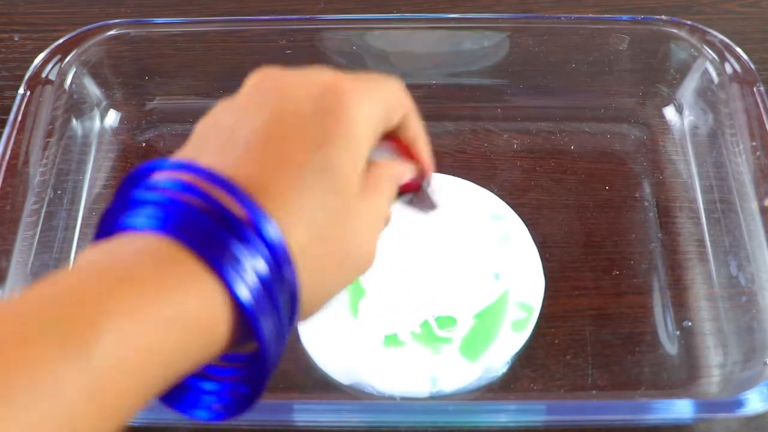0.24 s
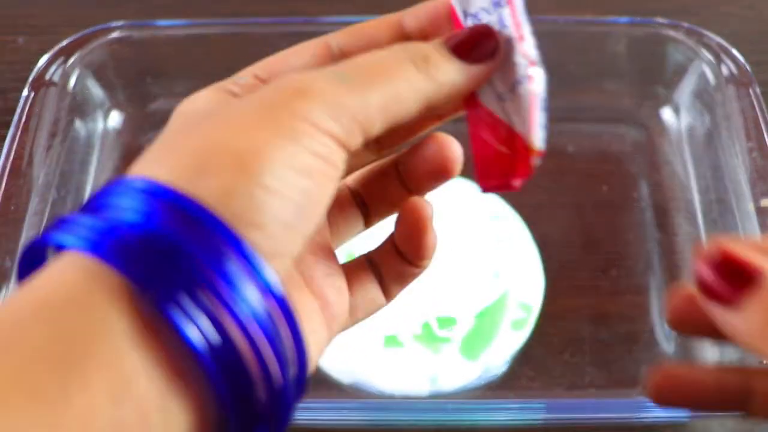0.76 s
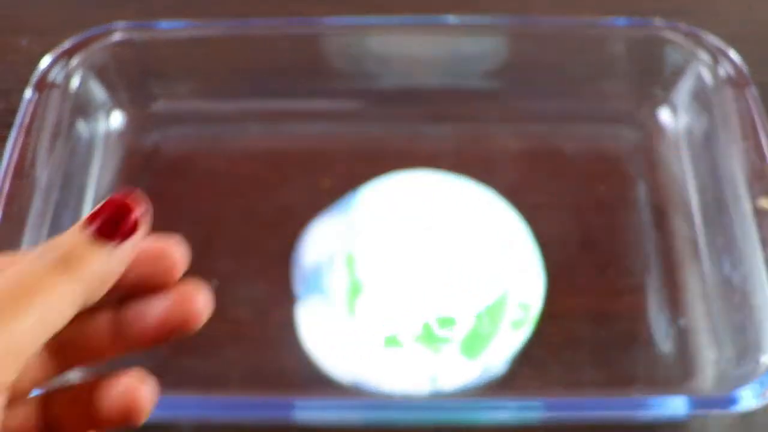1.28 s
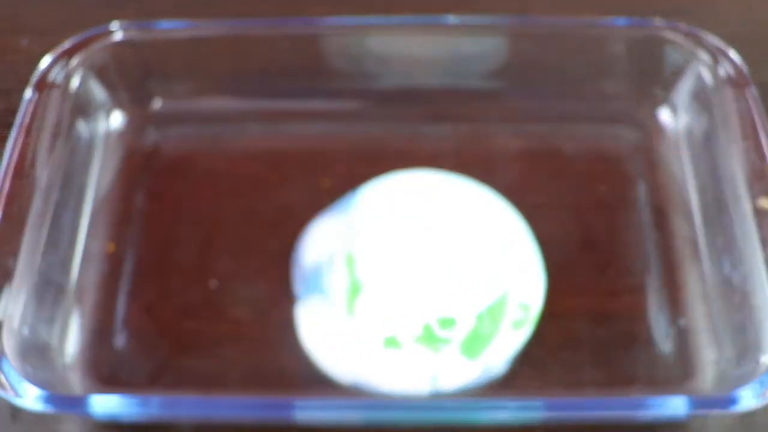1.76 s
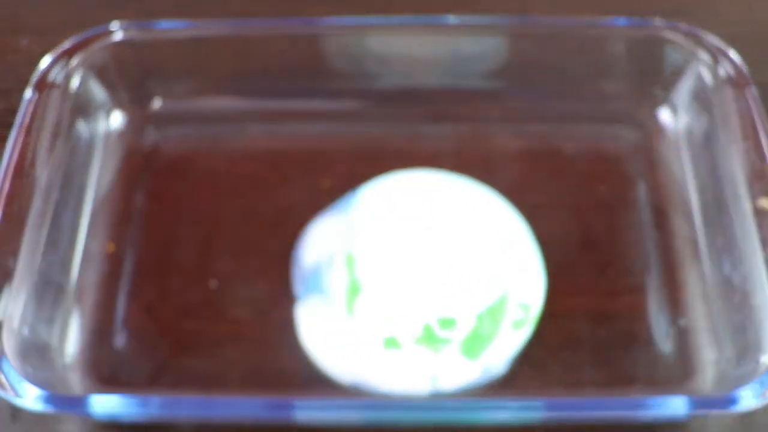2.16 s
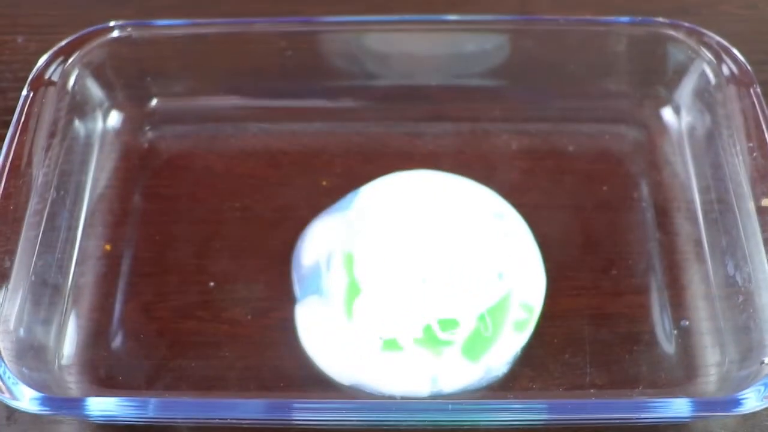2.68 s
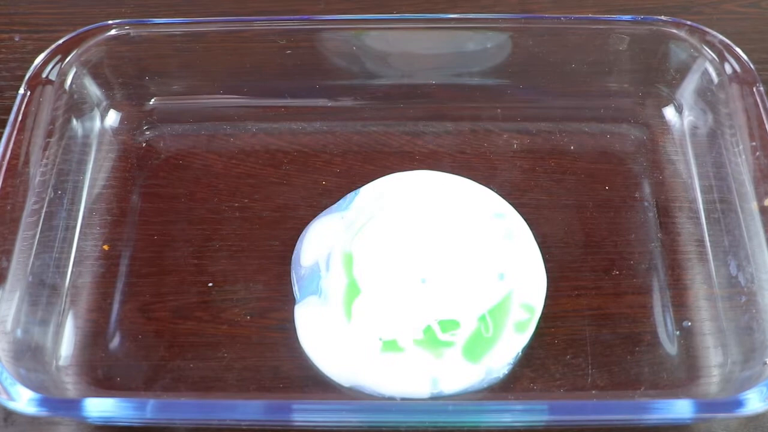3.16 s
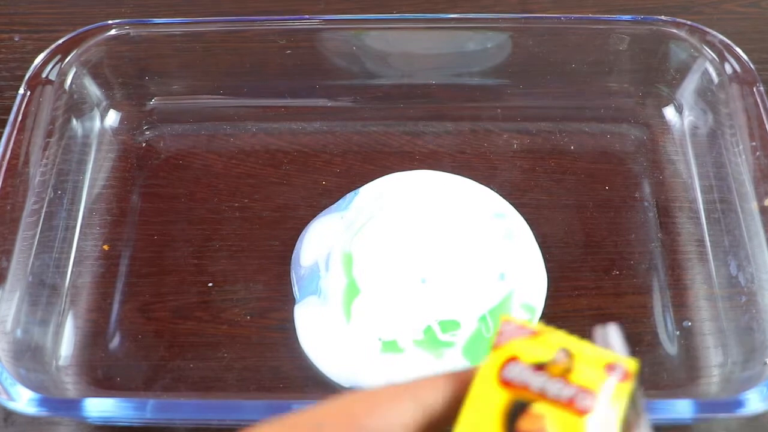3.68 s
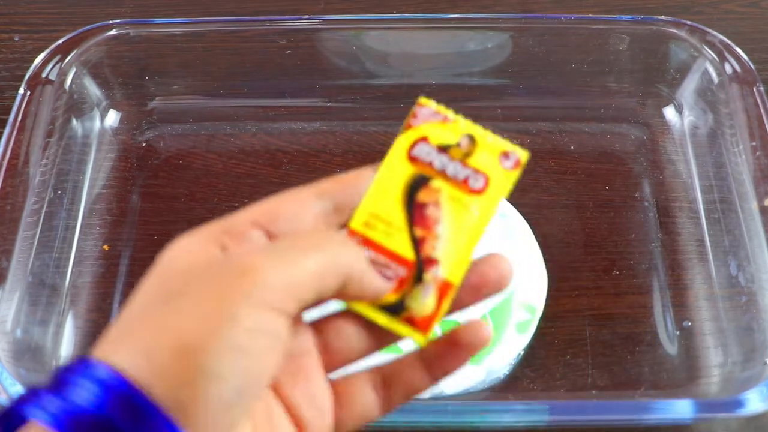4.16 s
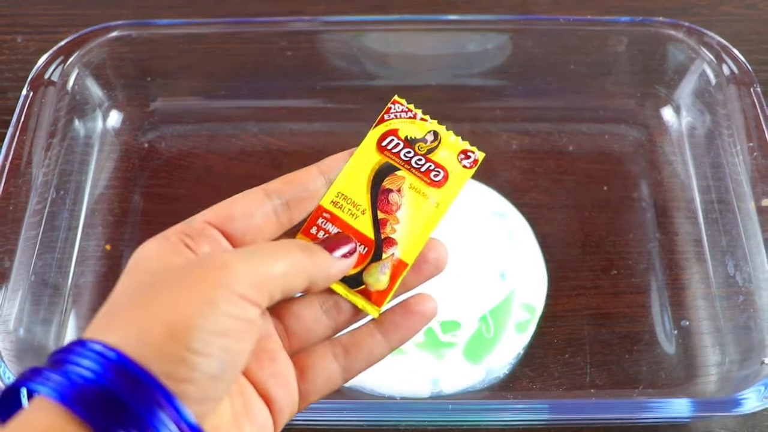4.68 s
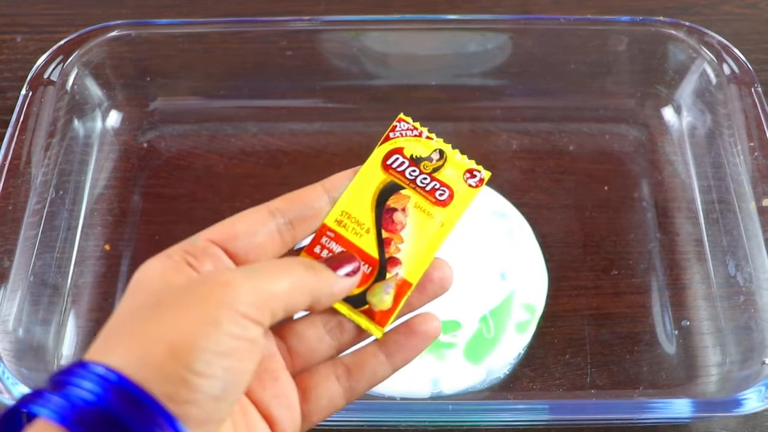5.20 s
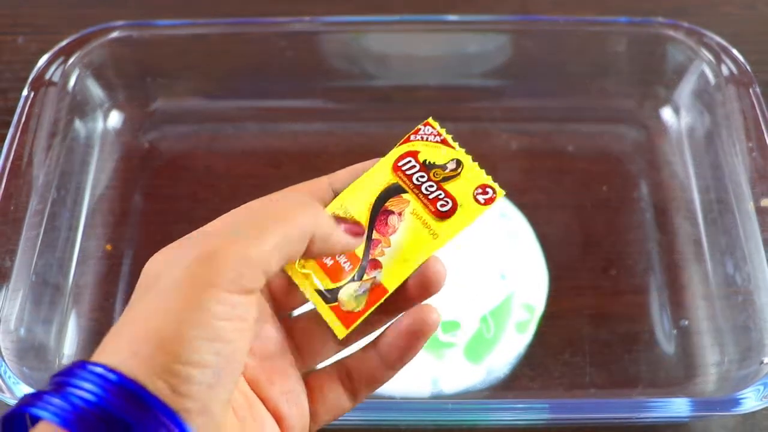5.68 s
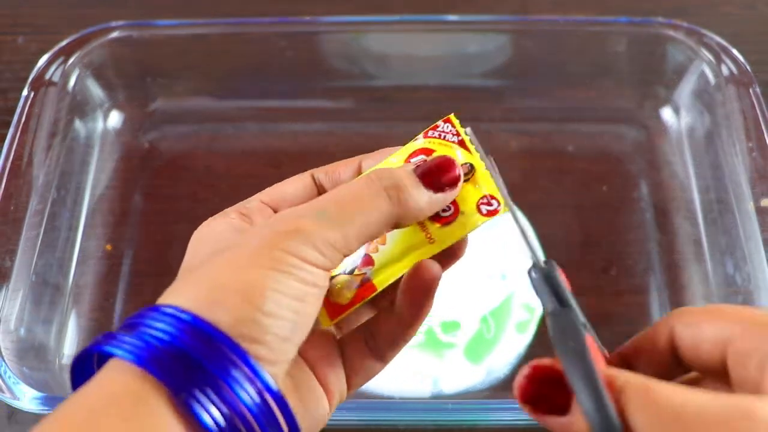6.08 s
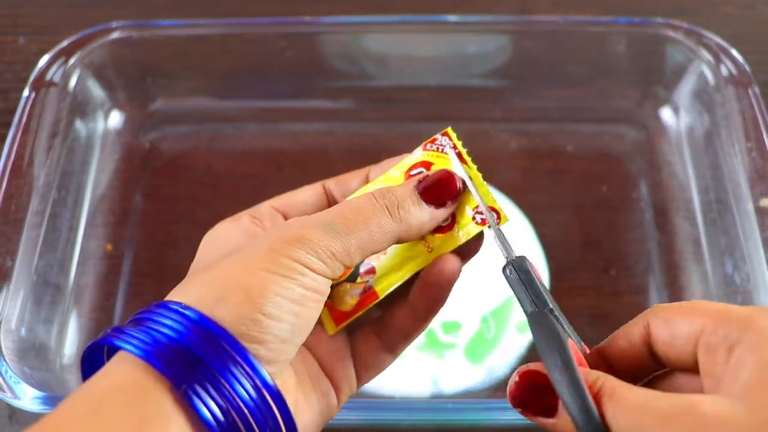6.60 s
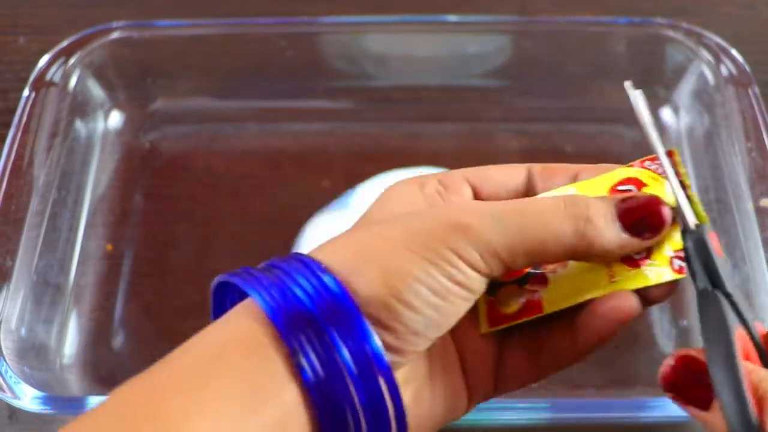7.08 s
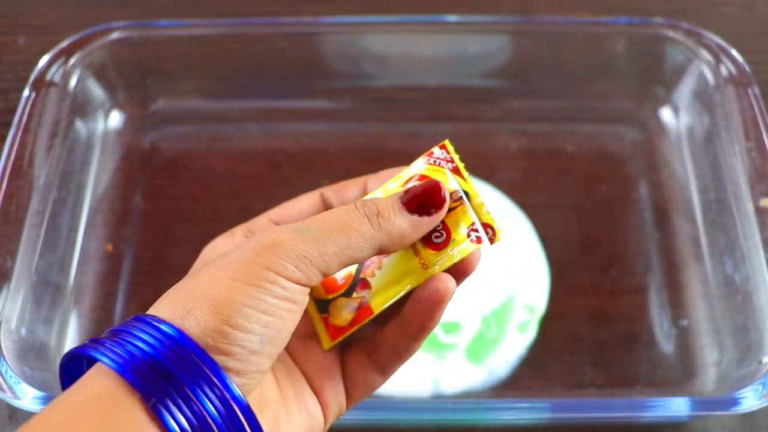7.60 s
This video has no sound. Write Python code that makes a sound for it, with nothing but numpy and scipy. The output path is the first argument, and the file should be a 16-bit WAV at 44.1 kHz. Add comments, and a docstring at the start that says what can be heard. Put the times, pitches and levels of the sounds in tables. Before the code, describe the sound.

A small plastic sachet crinkles close by, with crisp snaps through the first 0.6 seconds and a lighter rustle around 1.1. Soft bumps on a wooden table come with more crackles at 1.6 and 2.2 seconds, then a hard knock at 2.8. The film rustles again and gives its loudest, bright crackle at about 3.6, followed by lighter handling. A few very faint glassy pings sound around 5 seconds. Crinkling resumes from 5.6, with a sharp click at 6.3. Between 6.7 and 7.2 seconds, scissors make several short snips through the film, their steel ringing slightly. More crinkles follow, ending with a light knock at about 7.8. A small room adds a short echo. Underneath, a faint low hum wavers over steady microphone hiss, and a thin, quiet drone swells once around 6 seconds.

```python
"""Crinkling and snipping plastic sachets

Hands crinkle small plastic sachets over a glass dish on a wooden table: the film crackles and its
creases snap. Then scissors snip one open, and their steel rings. Things are set down on the table,
once hard, and there are a few faint glassy pings. A small room echoes it all.
Behind it, a low hum wavers over microphone hiss and a thin drone swells once."""
import sys
import numpy as np
from scipy import signal
from scipy.fft import rfft, irfft
from scipy.io import wavfile

SR = 44100
rng = np.random.default_rng(int(sys.argv[2]) if len(sys.argv) > 2 else 0)


def dump(signal):
    """Clip the signal to [-1, 1] and save it as 16-bit WAV at the path in sys.argv[1]."""
    limited = np.clip(np.atleast_2d(signal).T, -1, 1)
    pcm = np.round(limited * 32767).astype(np.int16)
    wavfile.write(sys.argv[1], SR, pcm)


N = 345744

# Tone of the hiss: f/Hz, level/dB
HISS_TONE = [(12, -37), (20, -17), (74, -5.5), (107, -19), (142, -3.5), (222, -9), (367, -12.5),
             (446, -14.5), (527, -11.5), (574, -15), (718, -13.5), (1810, -18), (2990, -18), (16000, -23)]
# How alike the hiss is left and right: f/Hz, likeness (1 = the same)
HISS_LIKENESS = [(60, 0.57), (240, 0.89), (950, 0.083), (3770, -0.14), (15000, -0.046)]
# How the hum wavers: t/s, level/dB
HUM_LEVELS = [(0.0, -76), (0.47, -68), (0.86, -75.5), (1.02, -70), (1.5, -91), (2.18, -58.5), (2.51, -67.5),
              (3.3, -60), (3.41, -76), (3.65, -61.5), (3.86, -61), (4.77, -72.5), (5.01, -61.5),
              (5.21, -57.5), (5.58, -72.5), (5.74, -65), (7.71, -64), (7.84, -53)]
# How long the room echoes: f/Hz, t60/s (t60 is the time to fade by 60 dB)
ROOM_FADE = [(150, 0.69), (500, 0.33), (2000, 0.3), (6000, 0.19), (14000, 0.18)]
# What the walls send back: f/Hz, level/dB
ROOM_TONE = [(150, -10.5), (600, 1), (2500, -1), (9000, 0)]
# How alike the echo is left and right: f/Hz, likeness
ROOM_LIKENESS = [(300, 1), (2000, 0.91), (6000, 0.64), (15000, 0.24)]
# Light touches of glass: t/s, level/dB
PING_TOUCHES = [(4.982, -60), (5.014, -53), (5.048, -56), (5.107, -54), (5.169, -54.5)]
# Notes of that glass: f/Hz, level/dB, t60/s
GLASS_NOTES = [(2300, -2, 0.038), (2950, -0.5, 0.039)]
# Things set down: t/s, level/dB, favoured f/Hz, hardness/dB, relative clatter/dB, ring length factor
BLOWS = [(1.635, -31.5, 383, -30, -27, 0.6), (2.192, -28, 462, -17.5, -14, 0.89),
         (2.7712, -11.5, 225, 1, 1, 0.98), (7.7723, -24, 384, -4.5, -30, 0.42)]
# Notes a blow rings, first the room's low boom, then the wooden table: f/Hz, level/dB, t60/s
BLOW_NOTES = [(145, -8.5, 0.78), (201.2, -1, 0.48), (233.6, 1, 0.22), (320, -32, 0.45), (488, -6.5, 0.36),
              (640.4, 2, 0.11), (821, -8.5, 0.33), (867, 2.5, 0.26), (990, -14, 0.39), (1129, -3.5, 0.35),
              (2070, -6.5, 0.35), (2430, -31, 0.6)]
# Tone of the clatter after a blow: f/Hz, level/dB
CLATTER_TONE = [(240, -13), (400, -21), (742, -5.5), (906, 0), (1380, -9), (2150, -5.5), (2970, -13.5),
                (7280, -19), (16000, -48)]
# Scissor cuts: t/s, level/dB, rise/s, hold/s
SCISSOR_CUTS = [(6.691, -43.5, 0.056, 0.0065), (6.795, -51, .014, 0.053), (6.941, -57.5, 0.058, .01),
                (7.052, -52.5, 0.007, 0.033), (7.167, -62, .015, .003)]
# Tone of film being cut: f/Hz, level/dB
CUT_TONE = [(180, -46), (300, -18), (737, -3.5), (828, -9.5), (2700, -7.5), (5160, -8), (8790, -10.5),
            (14700, -16.5), (16000, -23.5)]
# Ringing peaks of the snip, the blades and last the microphone's bright peak: f/Hz, width/Hz, level/dB
SNIP_PEAKS = [(750, 100, -16), (1890, 250, -17), (3570, 570, -13), (4300, 280, -16), (8800, 600, -6)]
# Film snaps and small clicks: t/s, level/dB, ring f/Hz, relative tick/dB, relative dish sound/dB
CREASE_SNAPS = [(0.0214, -37, 8440, -15, -35), (0.1273, -30.5, 2280, -29, -42),
                (0.1349, -35.5, 2700, -27, -41), (0.174, -25.5, 4330, 10, -40),
                (0.2595, -33, 2000, -6, -33), (0.273, -35.5, 5000, -9, -7), (0.2874, -38, 4850, -24.5, -22),
                (0.459, -37.5, 8380, -11, -13), (0.5046, -31, 4580, 1, -16), (0.5577, -21.5, 8200, -24, -3),
                (0.581, -43, 2550, -16, -23), (0.8592, -52, 1610, -14, 8.5), (1.0833, -39.5, 4470, 0, -15),
                (1.1162, -41.5, 1560, -14, 3), (1.622, -35.5, 3830, 0, -20), (1.6541, -44, 3570, -19, -19),
                (1.9385, -43, 7000, -8, -40), (2.1894, -44, 5810, 1, 7), (2.6742, -42, 2600, -18, -17),
                (2.689, -38.5, 2610, -17, -24), (3.448, -40, 2380, -19, -18), (3.613, -16, 3290, -24, -23),
                (3.64, -14, 8200, -23, -42), (3.823, -46, 2800, -20, -20), (4.0036, -38, 2330, 4, -4),
                (5.6441, -47, 2030, 7, -26), (5.9843, -39.5, 2470, -16, -32), (6.0453, -27, 4060, -22, -31),
                (6.1678, -30, 2870, -24, -33), (6.2034, -36.5, 2120, -18, 1.5),
                (6.326, -17, 3610, -35, -4.5), (6.673, -35, 8800, -12, -21), (6.6882, -24, 8800, -17, -35),
                (7.0516, -41, 3420, -21, -20), (7.0848, -38, 4300, -14, -31), (7.46, -35.5, 6060, 0, -21),
                (7.4956, -36.5, 3190, -14, -3), (7.7574, -33, 4160, -21, -9), (7.7706, -27.5, 2850, 1, -5)]
# Crinkles and slides of the film: t/s, level/dB, rise/s, fall/s, brightness/dB, ring f/Hz
CRINKLES = [(.026, -53.5, .04, 0.071, -0.5, 4800), (.126, -57, 0.013, .063, 5, 2400),
            (0.171, -44.5, 0.0042, 0.092, -1, 3840), (0.463, -51.5, 0.036, .16, -0.5, 4700),
            (0.555, -38.5, 0.004, 0.012, -12, 4260), (.655, -61, .03, .015, 3.5, 3460),
            (1.044, -60, .12, .02, -2, 3600), (1.122, -45, .031, .023, -1.5, 4560),
            (1.624, -40.5, 0.0053, 0.07, -6.5, 3770), (1.942, -54.5, 0.0085, 0.035, 9, 6460),
            (2.148, -49.5, 0.018, 0.1, -1, 4130), (2.21, -53, 0.067, 0.043, 6, 4940),
            (2.324, -59.5, 0.049, 0.093, -4, 2760), (2.564, -63.5, 0.029, .07, -16, 2870),
            (2.686, -55, 0.064, 0.15, -10, 2770), (3.296, -48.5, 0.065, .06, -7.5, 2500),
            (3.38, -58.5, .15, .15, -12, 2500), (3.45, -53.5, .05, 0.099, -28, 2550),
            (3.635, -33, 0.038, 0.072, -.5, 3980), (3.706, -54, .05, 0.12, 0.5, 6000),
            (3.834, -52, 0.023, 0.072, -21, 2530), (3.932, -52, 0.038, 0.084, -31, 2020),
            (4.12, -58.5, 0.095, .09, -1.5, 4460), (4.394, -44, 0.046, 0.06, -1, 5800),
            (4.97, -66, 0.053, .2, -7, 3090), (5.17, -60.5, .01, .084, -1.5, 3800),
            (5.646, -56.5, 0.023, .042, -4, 2520), (5.724, -54, 0.033, 0.098, -5, 3370),
            (5.988, -47, 0.053, 0.057, -3, 2640), (6.042, -54, .006, 0.021, -21, 4300),
            (6.167, -49.5, 0.0046, .15, -4, 3080), (6.24, -56, 0.088, .026, -9, 2630),
            (6.322, -38.5, .013, 0.025, -.5, 3420), (6.514, -57.5, .085, 0.022, -2.5, 3100),
            (6.62, -58, .04, 0.014, -15, 2830), (7.324, -60.5, 0.052, .1, -30, 3330),
            (7.404, -52.5, 0.11, 0.073, -2.5, 3450), (7.464, -47.5, 0.028, .12, -2, 4080),
            (7.773, -40.5, 0.028, 0.077, -7.5, 3900)]
# Tone of the crackling film: f/Hz, level/dB
FILM_TONE = [(180, -44), (300, -18), (678, -7.5), (870, -7), (1460, -11.5), (2100, -6.5), (4370, -8.5),
             (8360, -5), (10900, -16.5), (13300, -13.5), (16000, -36)]


def gain_of(db):
    return 10 ** (np.asarray(db) / 20)


def fade(t, t60):
    return gain_of(-60 * t / t60)


def evened(x):
    """Scales x to an average power of 1."""
    return x / np.sqrt(np.mean(x ** 2) + 1e-20)


def value_at(points, hz):
    """Looks up a pitch between the rows of a table."""
    f, value = np.transpose(points)
    return np.interp(np.log(hz + 1), np.log(f + 1), value)


def add(mix, s, sound):
    part = mix[round(s * SR):][:len(sound)]
    part += sound[:len(part)]


def coloured(x, tone):
    """Gives x the tone listed in a table."""
    return evened(irfft(rfft(x) * gain_of(value_at(tone, np.fft.rfftfreq(len(x), 1 / SR))), len(x)))


def resonate(x, hz, width):
    """Makes x ring near hz: shifts that pitch to zero, smooths, and shifts back."""
    turn = np.exp(2j * np.pi * np.cumsum(hz * np.ones(len(x))) / SR)
    r = np.exp(-np.pi * width / SR)
    return 2 * (turn * signal.lfilter([1 - r], [1, -r], x / turn)).real


def resonate_twice(x, hz, width):
    return resonate(resonate(x, hz, width), hz, width)


def crackle(per_s, spread_db, rub):
    """Scattered clicks of very unequal size over a steady rubbing noise."""
    size = gain_of(spread_db * np.minimum(rng.exponential(1, N), 4)) * (rng.random(N) < per_s / SR)
    return evened(size * rng.standard_normal(N)) + rub * rng.standard_normal(N)


def stereo(left, other, likeness):
    """Pairs the left channel with a right one that is partly like it."""
    alike = value_at(likeness, np.fft.rfftfreq(len(left), 1 / SR))
    right = irfft(alike * rfft(left) + np.sqrt(1 - alike ** 2) * rfft(other), len(left))
    return np.array([left, right])


def swell(s, db, rise, hold, fall):
    """Climbs to db at time s, holds, then drops; rise and fall are seconds per 20 dB."""
    t = np.arange(N) / SR
    away = np.maximum((s - t) / rise, (t - s - hold) / fall)
    return gain_of(db - 20 * np.clip(away, 0, 6))


def hiss(db=-58.5):
    """Steady noise of the two microphones and the quiet room."""
    left, other = (coloured(noise, HISS_TONE) for noise in rng.standard_normal((2, N)))
    return gain_of(db) * stereo(left, other, HISS_LIKENESS)


def hum(hz=147.8, width_hz=46):
    """A narrow band of low noise grows louder and softer."""
    level = gain_of(np.interp(np.arange(N) / SR, *np.transpose(HUM_LEVELS)))
    middle, side = (evened(resonate_twice(noise, hz, width_hz)) for noise in rng.standard_normal((2, N)))
    return level * np.array([middle + 0.22 * side, middle - 0.083 * side])


def drone(full_s=5.85):
    """A thin tone swells once, its pitch wobbling slightly."""
    t = np.arange(N) / SR
    hz = 173 + 2.2 * np.cos(2 * np.pi * 2.6 * (t - full_s))
    return swell(full_s, db=-57.5, rise=.15, hold=.45, fall=.25) * np.sin(2 * np.pi * np.cumsum(hz) / SR)


def room(x, db=-10, build_s=0.0084):
    """The walls send back many small echoes; the high pitches die first."""
    echoes = np.zeros((2, SR))
    arrivals = np.arange(0, SR - 20, 20) + rng.integers(0, 20, (2, SR // 20 - 1))
    np.put_along_axis(echoes, arrivals, rng.choice([-1., 1.], arrivals.shape), 1)
    hz, t, bands = signal.stft(echoes, SR, nperseg=256)
    build = np.minimum(t / build_s, 1) ** 2
    walls = gain_of(value_at(ROOM_TONE, hz)[:, None]) * fade(t, value_at(ROOM_FADE, hz)[:, None])
    left, other = signal.istft(bands * build * walls, SR, nperseg=256)[1]
    tail = stereo(left, other, ROOM_LIKENESS) / np.linalg.norm(left)
    return gain_of(db) * signal.fftconvolve(x[None], tail, axes=1)[:, :N]


def pings():
    """Each touch rings two close glass notes, like bangles meeting."""
    out, t = np.zeros(N), np.arange(3000) / SR
    ring = sum(gain_of(db) * fade(t, t60) * np.sin(2 * np.pi * hz * t) for hz, db, t60 in GLASS_NOTES)
    for s, db in PING_TOUCHES:
        add(out, s, gain_of(db) * ring * np.minimum(t / 0.0018, 1))
    return out


def thuds(ring_db=-12.5, crack_lead_s=.0032):
    """Each thing set down cracks and clatters; just after, the table rings and the room booms."""
    out, t = np.zeros(N), np.arange(SR) / SR
    for s, db, blow_hz, hard_db, clatter_db, length in BLOWS:
        ring = 0
        for hz, note_db, t60 in BLOW_NOTES:
            favour_db = 4.7 * np.exp(-(np.log2(hz / blow_hz) / .5) ** 2)
            treble_db = hard_db * np.clip(np.log2(hz / 450), 0, 1)  # soft blows barely stir high notes
            note = fade(t, length * t60) * np.sin(2 * np.pi * hz * t)
            ring = ring + gain_of(note_db + favour_db + treble_db) * note
        push = 3.44 * np.sin(2 * np.pi * blow_hz * t) * fade(t, 0.037)  # the top gives under the blow
        add(out, s, gain_of(db + ring_db) * (ring + push) * np.minimum(t / 0.0014, 1))
        clatter = coloured(rng.standard_normal(SR), CLATTER_TONE)
        crack = 0.64 * clatter + 1.03 * evened(np.diff(clatter, prepend=0))  # first contact is brighter
        contact = np.minimum(1, fade(t - .002, 0.0023))  # holds while the edge settles
        shake = 0.48 * crack * contact + gain_of(-10.5) * clatter * fade(t, length * 0.34)
        add(out, s - crack_lead_s, gain_of(db + clatter_db) * shake)
    return out


def scissors():
    """The blades catch and slip through the film and ring; the microphone adds a bright peak."""
    cutting = coloured(crackle(per_s=2500, spread_db=2.2, rub=0.67), CUT_TONE)
    ring = sum(gain_of(db) * evened(resonate(cutting, hz, width)) for hz, width, db in SNIP_PEAKS)
    return sum(swell(*cut, fall=0.042) for cut in SCISSOR_CUTS) * evened(cutting + ring)


def snaps(dish_hz=976):
    """A crease flips: a bright tick, and a short ring of the film and of the air in the dish."""
    out, t = np.zeros(N), np.arange(2000) / SR
    rise = np.minimum(t / 0.00066, 1) ** 2  # the crease gives way within a millisecond
    dish = np.sin(2 * np.pi * dish_hz * t) * rise * fade(t, t60=.014)
    for s, db, hz, tick_db, dish_db in CREASE_SNAPS:
        burst = rng.standard_normal(len(t)) * rise * fade(t, t60=.01)
        flip = np.sin(2 * np.pi * hz * t) * rise * np.exp(-hz * t / 2.5)  # lasts a few cycles
        ring = flip + resonate_twice(burst, hz, width=hz)
        tick = np.diff(burst, prepend=0)
        snap = ring / abs(ring).max() + gain_of(tick_db) * tick / abs(tick).max()
        add(out, s, gain_of(db) * (snap + gain_of(dish_db) * dish))
    return out


def film_patches(clump_db=6.15, clumps_per_s=45):
    """Many small patches of film each ring at their own pitch and crackle in their own clumps."""
    out = np.zeros(N)
    for hz in np.geomspace(500, 15000, num=18):
        clumps = evened(signal.resample(rng.standard_normal(round(N / SR * clumps_per_s)), N))
        ring = resonate(crackle(per_s=700, spread_db=2.8, rub=0.9), hz, width=0.21 * hz)
        out += gain_of(clump_db * clumps) * np.sqrt(hz) * evened(ring)
    return out


def rustle():
    """Handled film crackles: a dull part, a bright part, and the ring of the patch being bent."""
    film = coloured(film_patches(), FILM_TONE)
    dull = signal.sosfiltfilt(signal.butter(2, 5500, fs=SR, output="sos"), film)
    bright = evened(film - dull)
    powers = np.array([swell(s, db, rise, 0, fall) for s, db, rise, fall, _, _ in CRINKLES]) ** 2
    total = powers.sum(0)
    bright_db, patch_hz = np.array(CRINKLES)[:, 4:].T @ powers / total  # the loudest sets the tone
    rubbing = crackle(per_s=1200, spread_db=2.5, rub=1.2)
    patch = evened(resonate_twice(rubbing, patch_hz, width=750))
    bright_share = gain_of(bright_db)
    dull_share = np.sqrt(np.clip(1 - bright_share ** 2, .01, 1))
    body = dull_share * (0.81 * evened(dull) + 0.26 * patch) + 0.19 * patch
    return np.sqrt(total) * (body + 0.8 * bright_share * bright)


def scene():
    """Mixes the sounds at the table, their echo and the background."""
    thin_film = signal.butter(2, 550, "high", fs=SR, output="sos")  # thin film gives off no bass
    low_cut = signal.butter(2, 90, "high", fs=SR, output="sos")  # the microphone drops the deepest bass
    near = signal.sosfilt(thin_film, snaps() + rustle()) + pings() + scissors() + thuds()
    return signal.sosfilt(low_cut, near + room(near)) + hum() + drone() + hiss()


def record(dry, top_hz=16100):
    """Cuts off the very highest treble."""
    return signal.oaconvolve(dry, signal.firwin(255, top_hz, window=("kaiser", 9), fs=SR)[None], "same")


dry = scene()
out = record(dry)
dump(out)
```